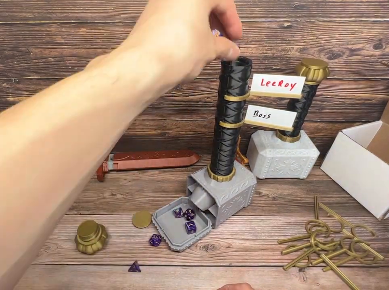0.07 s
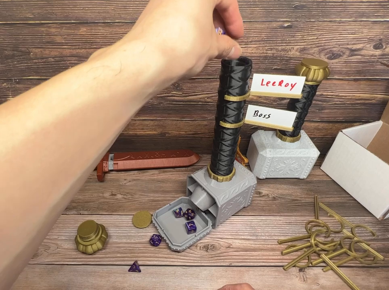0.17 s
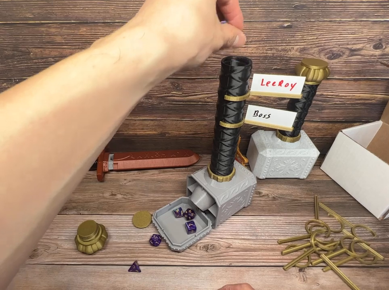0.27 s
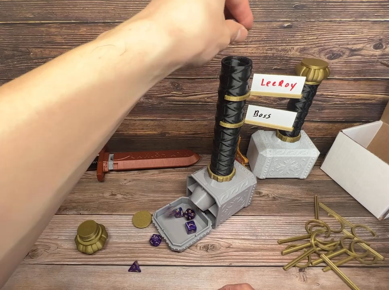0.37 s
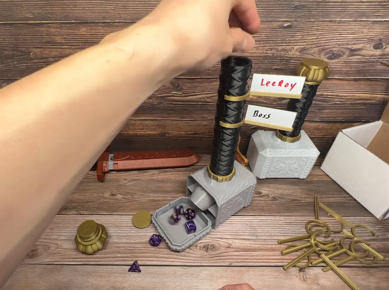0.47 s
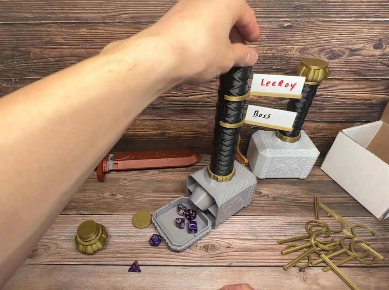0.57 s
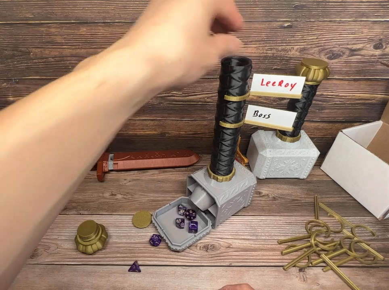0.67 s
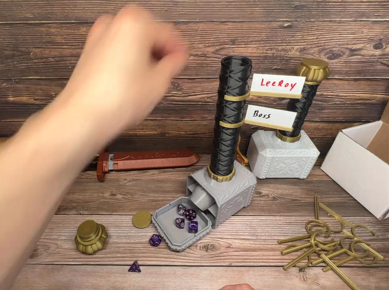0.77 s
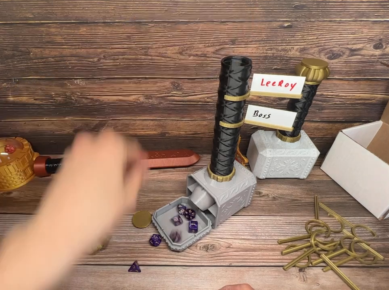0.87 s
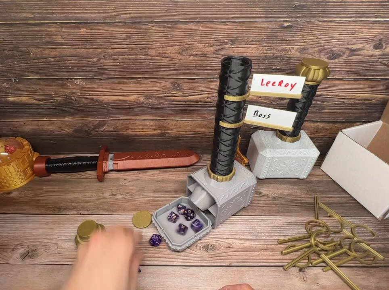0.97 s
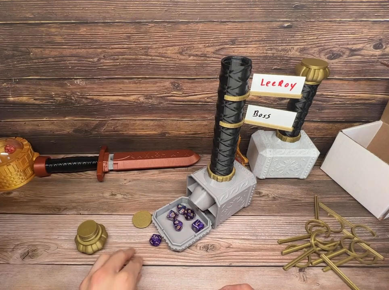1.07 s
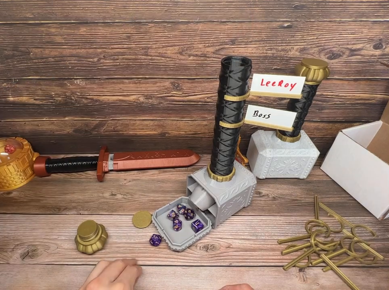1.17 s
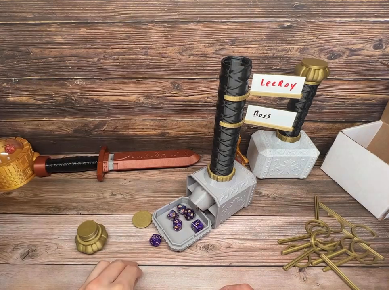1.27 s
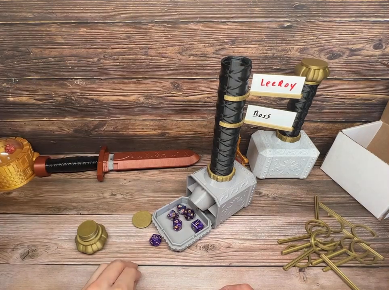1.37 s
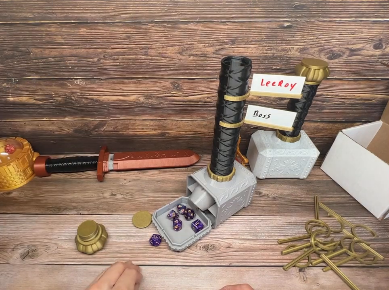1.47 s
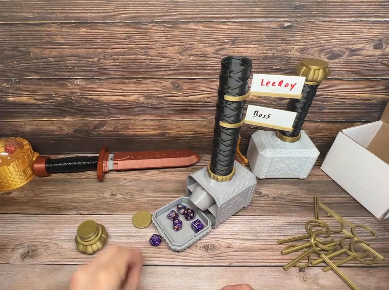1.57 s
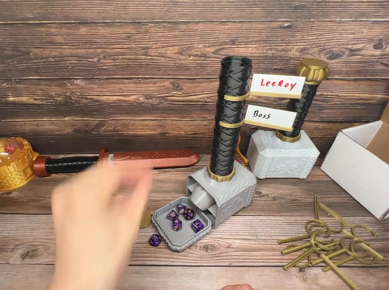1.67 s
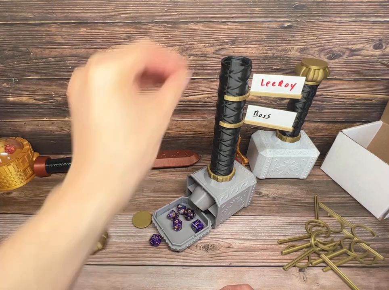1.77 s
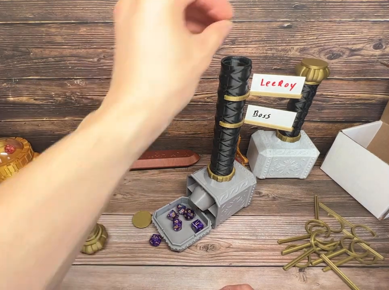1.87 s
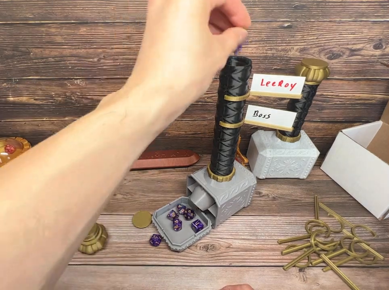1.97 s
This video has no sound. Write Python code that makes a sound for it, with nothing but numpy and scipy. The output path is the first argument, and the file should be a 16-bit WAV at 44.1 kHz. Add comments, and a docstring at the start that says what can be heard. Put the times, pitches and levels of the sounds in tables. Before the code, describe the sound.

Plastic dice knock down a tube and rattle among other dice in a tray, faint hum behind.

```python
"""On a table in a small room, two hard plastic dice drop one after the other down a plastic tower.
Each die knocks on baffles in the tube, booms the hollow base, then clacks into the tray among other dice.
A blow is a short burst of shaped noise plus fading sine waves; most of it also gets an echoing room tail.
Tumbling dice make small uneven ticks. Hum, room air and hiss are steady noises, each with its own colour;
only the hiss drifts in level."""
import sys
import numpy as np
from scipy import signal
from scipy.fft import rfft, irfft
from scipy.io import wavfile
from scipy.ndimage import uniform_filter1d

SR = 44100
rng = np.random.default_rng(int(sys.argv[2]) if len(sys.argv) > 2 else 0)


def transcribe(signal):
    """Save signal, clipped to [-1, 1], as a 16-bit WAV file at the path in sys.argv[1]."""
    frames = np.atleast_2d(signal).T
    limited = np.clip(frames, -1, 1)
    pcm = np.round(limited * 32767).astype(np.int16)
    wavfile.write(sys.argv[1], SR, pcm)


N = 88200  # samples: two seconds


def amp(db):
    """Turn decibels into a gain."""
    return 10 ** (np.asarray(db) / 20)


def unit(x):
    """Scale to an average strength (rms) of 1."""
    return x / np.sqrt(np.mean(x ** 2) + 1e-20)


def along(points, hz):
    """Read a curve of (pitch, value) points, with pitch on a log axis."""
    point_hz, values = np.transpose(points)
    return np.interp(np.log(hz + 1), np.log(point_hz + 1), values)


def clock():
    """Time in seconds over the half second in which a blow dies away."""
    return np.arange(SR // 2) / SR


def add(track, start_s, sound):
    """Mix a sound into the track at its start time."""
    i = max(round(start_s * SR), 0)
    track[:, i:i + sound.shape[-1]] += sound[..., :N - i]


def filtered(x, response):
    """Multiply the spectrum of x by a gain that depends on frequency."""
    padded = 2 * x.shape[-1]
    spectrum = rfft(x, padded) * response(np.fft.rfftfreq(padded, 1 / SR))
    return irfft(spectrum, padded)[..., :padded // 2]


def causal(gain):
    """Give a gain curve the phase that makes it ring only after the blow (minimum phase)."""
    cepstrum = irfft(np.log(np.maximum(gain, 1e-6)))
    half = len(cepstrum) // 2
    cepstrum[1:half] *= 2
    cepstrum[half + 1:] = 0
    return np.exp(rfft(cepstrum))


def spread(pair, width):
    """Make left and right from a middle and a side signal."""
    middle, side = pair[0], width * pair[1]
    return np.array([middle + side, middle - side]) / np.sqrt(1 + width ** 2)


def coloured_noise(colour, width):
    """Steady stereo noise with the given colour, at rms 1."""
    noise = filtered(rng.standard_normal((2, N)), lambda hz: amp(along(colour, hz)))
    return unit(spread(noise, width))


# colour of the low indoor hum: pitch_hz, relative_level_db
HUM_COLOUR = [(22, -24.5), (50, 1), (76, -14.5), (112, -20.5), (128, -4), (184, 1.5), (227, -14),
              (263, -11.5), (401, -15.5), (465, -10), (549, -24.5), (900, -30), (1170, -57.5), (1980, -120)]
HUM_DB, HUM_WIDTH = -52.5, .11  # level in dB; side over middle


def hum():
    """Low indoor hum: noise gathered around a few low pitches, nearly the same in both ears."""
    return amp(HUM_DB) * coloured_noise(HUM_COLOUR, HUM_WIDTH)


# colour of the steady room air: pitch_hz, relative_level_db
ROOM_AIR_COLOUR = [(400, -6), (800, -9), (1500, -8), (2200, -14.5), (9000, -42)]
ROOM_AIR_DB = -65


def room_air():
    """Steady wide noise of the room air, weaker towards the treble."""
    return amp(ROOM_AIR_DB) * coloured_noise(ROOM_AIR_COLOUR, width=1.0)


# colour of the faint hiss: pitch_hz, relative_level_db
HISS_COLOUR = [(400, -13.5), (700, -0.5), (1500, -13), (4150, -10.5), (7300, -13), (9100, -15.5),
               (11000, -33.5), (13500, -43.5), (16000, -39.5)]
# how the hiss drifts: time_s, level_db
HISS_DRIFT = [(0, -62), (0.749, -62), (1.3, -69), (1.478, -72.5), (1.581, -65.5), (1.699, -71),
              (1.851, -60.5), (2, -62.5)]


def hiss():
    """Faint wide noise whose level slides between the points of its drift table."""
    level_db = np.interp(np.arange(N) / SR, *np.transpose(HISS_DRIFT))
    return amp(level_db) * coloured_noise(HISS_COLOUR, width=1.0)


# how long the room tail takes to fall by 60 dB: pitch_hz, fall_time_s
ROOM_FALL = [(150, 0.41), (500, 0.31), (2000, 0.28), (7000, 0.26), (14000, 0.27)]
# strength of the room tail: pitch_hz, level_db
ROOM_STRENGTH = [(150, 5.5), (700, 0), (2000, -4), (6000, -4.5), (14000, -15)]
ROOM_RISE_S, ROOM_WIDTH = 0.0074, 0.89  # build-up time of the tail in s; side over middle


def in_room(x):
    """Add a small room's answer: x convolved with noise that fades at its own rate at each pitch."""
    t = clock()
    hz, time_s, noise = signal.stft(rng.standard_normal((2, len(t))), SR, nperseg=256)
    fall_s = along(ROOM_FALL, hz)[:, None]
    fade = amp(along(ROOM_STRENGTH, hz)[:, None] - 60 * time_s / fall_s)
    fade = fade * np.sqrt(2 * np.log(1000) / (fall_s * SR))  # a longer tail is not a stronger one
    tail = signal.istft(noise * fade, SR, nperseg=256)[1][:, :len(t)]
    tail = tail * (1 - np.exp(-(t / ROOM_RISE_S) ** 2))
    return x + signal.fftconvolve(x, spread(tail, ROOM_WIDTH), axes=1)[:, :x.shape[1]]


def ring(modes, rise_s, width=0.079, detune=0):
    """Fading sine waves (modes); level and phase vary by blow, phase by ear, pitch by the detune share."""
    t, out = clock(), 0
    for pitch_hz, level_db, fall_s in modes:
        phase = rng.uniform(0, 2 * np.pi) + width * rng.standard_normal((2, 1))
        pitch = pitch_hz * (1 + detune * rng.standard_normal())
        level = amp(level_db + rng.normal(0, 1) - 60 * t / fall_s)
        out = out + level * np.sin(2 * np.pi * pitch * t + phase)
    return out * (1 - np.exp(-t / rise_s))


CONTACT_RISE_S, CONTACT_HOLD_S = 0.00039, 0.0031


def burst(fall_s, hold_s):
    """Loudness shape of a contact: a quick rise, a short hold and a steep fall (60 dB in fall_s)."""
    t = clock()
    return (1 - np.exp(-t / CONTACT_RISE_S)) * amp(-60 * np.maximum(t - hold_s, 0) / fall_s)


# stereo width of a contact: pitch_hz, side_over_middle
CONTACT_WIDTH = [(100, .1), (300, 0.12), (1000, 0.74), (2500, 0.7), (4500, 1), (14000, 0.98)]
# how much stronger a contact is on the left than on the right: pitch_hz, difference_db
CONTACT_LEAN = [(700, -1.5), (1500, 4), (2500, -0.5), (4000, 3.5), (5500, 8.5), (8000, 2), (14000, -2)]
CONTACT_FALL_S = 0.017  # the clatter between close walls
TREBLE_HZ = 4180  # the treble level acts above about here


def contact(colour, treble_db, hold_s):
    """Dense echoes between plastic walls: a brief noise burst in the colour of the struck part."""
    t, shape = clock(), burst(CONTACT_FALL_S, hold_s)
    early = t < t[-1] / 2  # drops what wraps round from the spectrum steps
    spectrum = rfft(rng.standard_normal((2, len(t))) * shape)
    # even out the broad bumps of the noise before colouring it
    power = uniform_filter1d(np.abs(spectrum) ** 2, size=200, axis=1)
    even = irfft(spectrum / np.sqrt(np.abs(power) + 1e-12)) * early
    hz = np.fft.rfftfreq(len(t), 1 / SR)
    stereo = spread(rfft(even), along(CONTACT_WIDTH, hz))
    stereo = stereo * amp(along(CONTACT_LEAN, hz) * np.array([[.5], [-.5]]))
    treble = hz ** 4 / (hz ** 4 + TREBLE_HZ ** 4)
    gain = unit(amp(along(colour, hz))) * amp(treble_db * treble)
    return irfft(stereo * causal(gain)) * early * np.linalg.norm(shape)


SPOT_FALL_S = .009


def spot(pitch_hz, width=0.31):
    """The struck spot sings its own pitch very briefly, slightly out of step between the ears."""
    phase = rng.uniform(0, 2 * np.pi) + width * np.array([[1], [-1]])
    wave = np.sin(2 * np.pi * pitch_hz * clock() + phase)
    return np.sqrt(2) * burst(SPOT_FALL_S, CONTACT_HOLD_S) * wave


RING_RISE_S, WALL_RISE_S = 0.00069, 0.0008
DETUNE = .012  # typical share by which a part's pitches shift as the die leans on it
SPOT_ROOM = .45  # share of the spot's ring that reaches the room; the rest is heard only direct


def strikes(rows, colour, modes, wall):
    """Each blow: a contact, a ring of the spot, a hollow wall knock and the modes of the whole part."""
    out = np.zeros((2, N))
    for start_s, level_db, ring_hz, ring_db, treble_db, wall_db in rows:
        knock = 2 * amp(wall_db) * ring(wall, WALL_RISE_S, detune=DETUNE)
        ping = amp(ring_db) * spot(ring_hz)
        clack = contact(colour, treble_db, CONTACT_HOLD_S)
        blow = in_room(clack + knock + SPOT_ROOM * ping) + (1 - SPOT_ROOM) * ping
        whole_part = ring(modes, RING_RISE_S, detune=DETUNE)
        add(out, start_s, amp(level_db) * (blow + whole_part))
    return out


# ringing of the table: pitch_hz, level_db, fall_time_s (to fall 60 dB)
TABLE_RING = [(50.6, 0.00079, 0.21)]
THUD_S, THUD_DB = 1.165, -40.5  # start in s; level in dB
BOOM_RISE_S = 0.009  # swell of the thud and of the booms


def table_thud():
    """The table gives one soft low thud as the dice settle."""
    out = np.zeros((2, N))
    add(out, THUD_S, amp(THUD_DB) * ring(TABLE_RING, BOOM_RISE_S, width=.05))
    return out


# booms of the hollow base: start_s, level_db
BASE_BOOMS = [(0.202, -42), (0.372, -28), (0.493, -43), (0.829, -27.5), (0.884, -30), (.992, -36),
              (1.129, -38)]
# ringing of the hollow base: pitch_hz, level_db, fall_time_s (to fall 60 dB)
BASE_RING = [(81.5, -10.5, 0.074), (135, -0.5, 0.12), (215, 7, 0.133), (286, -1.5, 0.1)]


def base_booms():
    """The hollow base swells and booms at a few low pitches."""
    out = np.zeros((2, N))
    for start_s, level_db in BASE_BOOMS:
        add(out, start_s, amp(level_db) * ring(BASE_RING, BOOM_RISE_S, width=0.041))
    return out


# a die tumbles down the ramp or rolls out in the tray: start_s, end_s, level_db
TUMBLES = [(0.496, 0.66, -31.5), (0.878, 0.947, -46), (1.001, 1.17, -28.5)]
# colour of a blow on the tray, for ticks and clacks: pitch_hz, relative_level_db
TRAY_COLOUR = [(100, -40), (260, -4.5), (480, -15), (1250, -10.5), (1900, 1), (3200, -3), (4100, -5),
               (6200, -3.5), (8500, -8.5), (10200, -17), (11800, -12), (13700, -32), (15800, -25)]
# ringing of the whole tray, for ticks and clacks: pitch_hz, level_db, fall_time_s (to fall 60 dB)
TRAY_RING = [(664, -21, 0.07), (1086, -29, .22), (2250, -19, .08), (3250, -17, 0.05)]
TICKS_PER_S, TICK_SCATTER_DB = 70, 3.5


def rolling():
    """Small, short, uneven ticks as a die tumbles on its edges."""
    out = np.zeros((2, N))
    for start_s, end_s, level_db in TUMBLES:
        count = max(int((end_s - start_s) * TICKS_PER_S), 1)
        for k in range(count):
            share = (k + rng.random()) / count  # how far through the roll
            tick = contact(TRAY_COLOUR, treble_db=-6.5, hold_s=0)
            tick = tick + ring(TRAY_RING, RING_RISE_S, detune=DETUNE)
            tick_db = level_db + rng.normal(0, TICK_SCATTER_DB)
            add(out, start_s + share * (end_s - start_s), amp(tick_db) * tick)
    return in_room(out)


# light taps: start_s, level_db, ring_hz, ring_db, treble_db, wall_knock_db (before doubling)
MOUTH_TAPS = [(.1768, -28.5, 2850, -6, 0.5, -3.5), (.1980, -22, 1790, -4, -6, -11),
              (.2128, -31.5, 1830, 2.5, -1.5, -9.5), (.2264, -35.5, 1730, 3.5, 7.5, -2.5),
              (.2758, -33.5, 2280, -8, 10, -18)]
# colour of a blow on the rim: pitch_hz, relative_level_db
RIM_COLOUR = [(150, -16.5), (1000, -14.5), (1800, -1.5), (2700, -2.5), (4000, -18), (7000, -23),
              (12000, -28.5), (16000, -51.5)]
# ringing of the whole rim: pitch_hz, level_db, fall_time_s (to fall 60 dB)
RIM_RING = [(760, -16.5, 0.07), (1720, -19, 0.15)]
# hollow knock at the mouth: pitch_hz, level_db, fall_time_s (to fall 60 dB)
RIM_KNOCK = [(742, 0, 0.028)]


def rim_taps():
    """Light taps of a die on the rim at the mouth of the tube, which rings briefly."""
    return strikes(MOUTH_TAPS, RIM_COLOUR, RIM_RING, RIM_KNOCK)


# knocks in the tube: start_s, level_db, ring_hz, ring_db, treble_db, wall_knock_db (before doubling)
TUBE_KNOCKS = [(.3670, -9.5, 1790, -8, 4.5, -29), (.3854, -18, 2680, 7.5, 1.5, -17.5),
               (.3945, -25.5, 2200, 3.5, 2.5, 0), (.4130, -27.5, 2340, 0.5, 5, -8),
               (.8276, -7, 1886, -8.5, -7, -24), (.8478, -23.5, 2360, -7, 6, -11),
               (.8602, -14.5, 2020, -14, 1.5, -9.5), (.8800, -19, 3190, -6, 13.5, -12),
               (.9390, -34, 1720, -5, -9, -10)]
# colour of a blow inside the tube: pitch_hz, relative_level_db
TUBE_COLOUR = [(100, -27.5), (300, -20), (1270, -27.5), (1480, 0), (2600, -5.5), (3300, -7), (4100, -19),
               (5500, -17.5), (6900, -25), (8500, -19), (10300, -34), (12000, -24.5), (13700, -48.5),
               (16000, -40)]
# ringing of the whole tube: pitch_hz, level_db, fall_time_s (to fall 60 dB)
TUBE_RING = [(647, -28, 0.48), (1158.4, -25.5, 0.18), (1449.4, -17.5, 0.13), (1624, -30.5, 0.12),
             (1872, -24, 0.45), (2295, -15, 0.077), (2500, -26.5, 0.17), (2480, -21, 0.2),
             (2540, -25.5, 0.091)]
# hollow knock of the tube wall: pitch_hz, level_db, fall_time_s (to fall 60 dB)
TUBE_KNOCK = [(707, -2.5, 0.038), (1190, -4, .03)]


def baffle_knocks():
    """Dice hit the baffles and set the plastic tube ringing."""
    return strikes(TUBE_KNOCKS, TUBE_COLOUR, TUBE_RING, TUBE_KNOCK)


# clacks in the tray and against resting dice:
# start_s, level_db, ring_hz, ring_db, treble_db, wall_knock_db (before doubling)
CLACKS = [(.4722, -17, 2206, -1, -4.5, -6), (.4858, -16.5, 3200, 0.5, 1, -9),
          (.5473, -34.5, 3340, -7.5, 8, -24), (.5675, -40, 1650, -15, 5, -6),
          (.5783, -30.5, 3264, -16, 5, -18), (.5970, -32, 1580, -25, -1, -4), (.6268, -36, 1500, -9, 2, 0),
          (.6433, -35, 1098, -15, -8, -13.5), (.9166, -23.5, 1910, -5.5, 5.5, -5.5),
          (.9642, -17.5, 3160, -5, -4, -6.5), (.9750, -15.5, 3200, -6, -1.5, -8.5),
          (.9956, -24.5, 2560, 0.5, 3.5, -37), (1.0378, -53, 3200, -2, 19, -22),
          (1.0738, -33, 2440, -9.5, 4.5, -5), (1.0776, -29, 3230, -5, 1, -5),
          (1.1160, -41.5, 2320, -14, 5.5, 4), (1.1300, -28, 2410, -14.5, -34, -9),
          (1.1465, -38.5, 2460, 0, -0.5, -5), (1.1595, -38.5, 2230, -17, -3, 1.5),
          (1.2100, -55, 1503, 10.5, -5, -1)]
# hollow knock of the tray floor: pitch_hz, level_db, fall_time_s (to fall 60 dB)
TRAY_KNOCK = [(720, -0.5, 0.012), (950, 0, .018)]


def tray_clacks():
    """Dice clack on the tray floor and on resting dice, over short tray ringing."""
    return strikes(CLACKS, TRAY_COLOUR, TRAY_RING, TRAY_KNOCK)


def scene():
    """Add up the dice in the tower and tray, the base and table under them, and the background."""
    tower = rim_taps() + baffle_knocks()
    tray = tray_clacks() + rolling()
    underneath = base_booms() + table_thud()
    background = hum() + room_air() + hiss()
    return tower + tray + underneath + background


RUMBLE_CUT_HZ, TOP_HZ = 41, 16300


def record(dry):
    """The recorder rounds off the highest peaks, cuts deep rumble and falls off steeply above its top."""
    rounded = dry / (1 + np.abs(dry) ** 6) ** (1 / 6)
    low_cut = signal.butter(4, RUMBLE_CUT_HZ, "highpass", fs=SR, output="sos")
    without_rumble = signal.sosfilt(low_cut, rounded)
    return filtered(without_rumble, lambda hz: 1 / np.sqrt(1 + (hz / TOP_HZ) ** 160))


dry = scene()
out = record(dry)
transcribe(out)
```